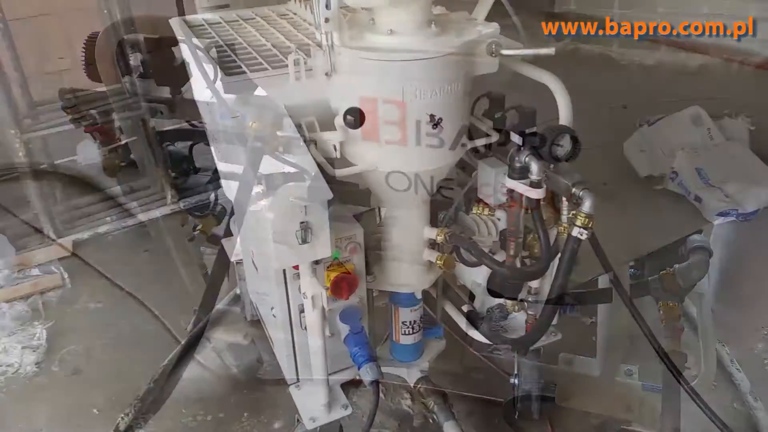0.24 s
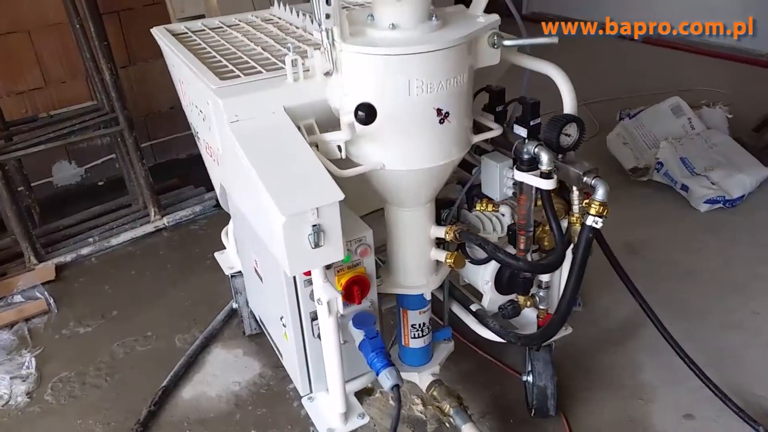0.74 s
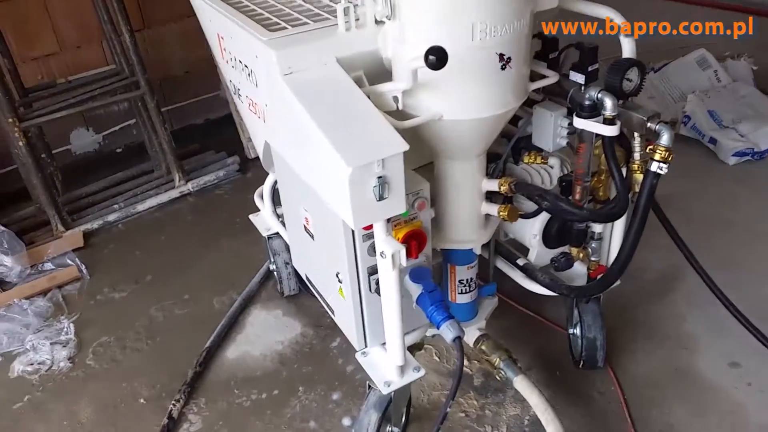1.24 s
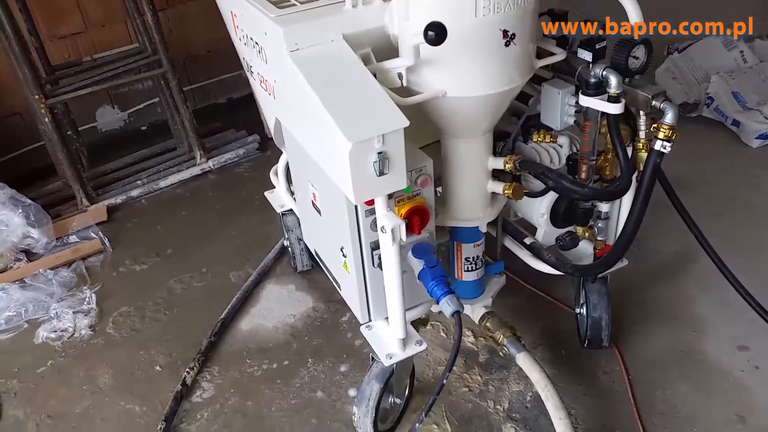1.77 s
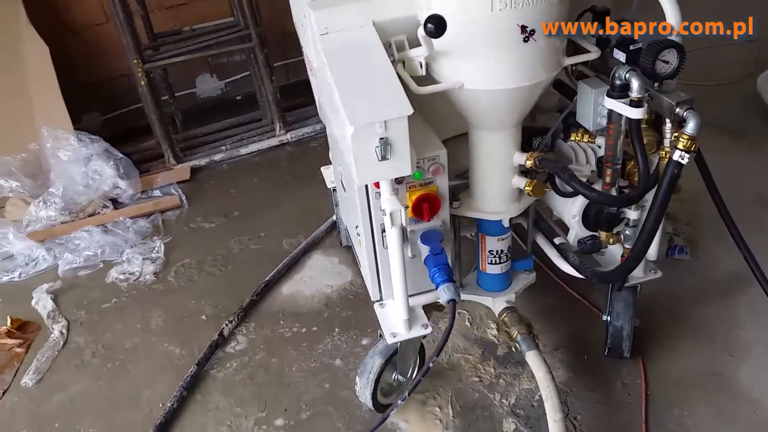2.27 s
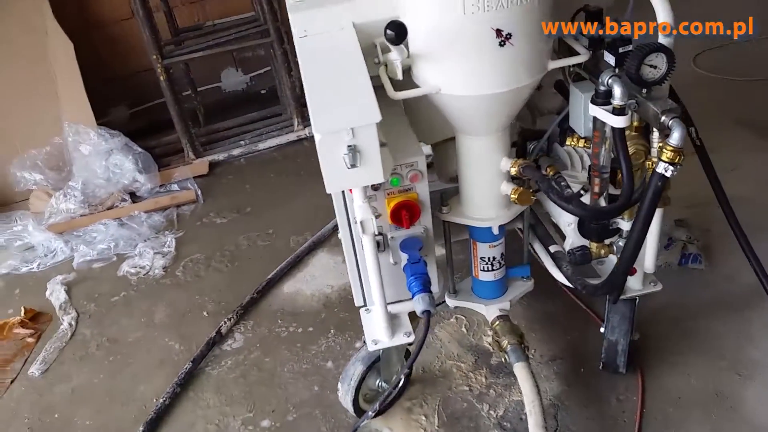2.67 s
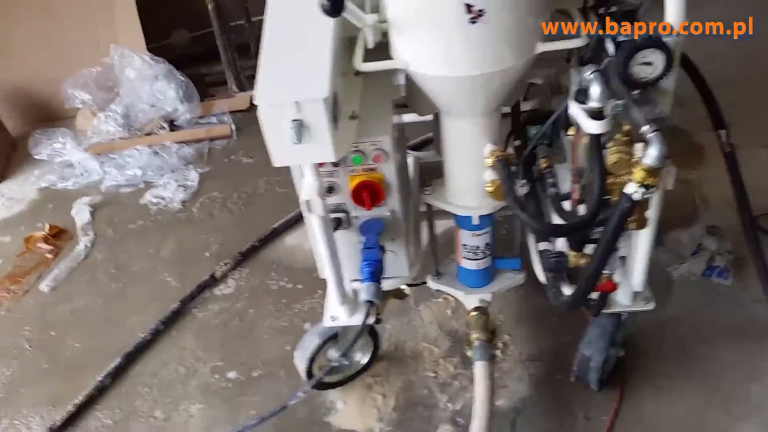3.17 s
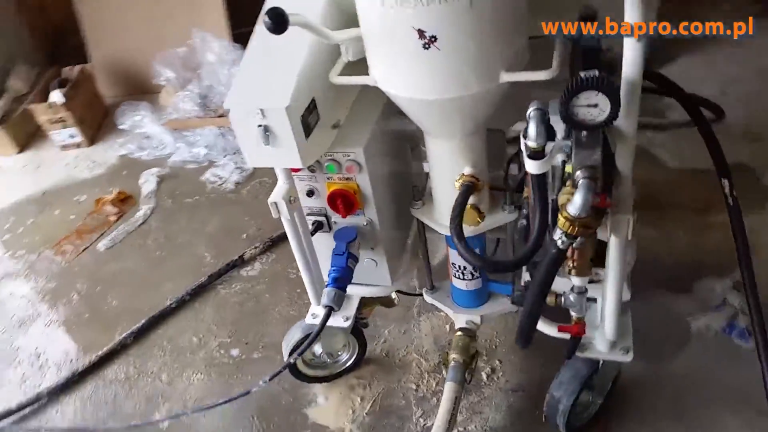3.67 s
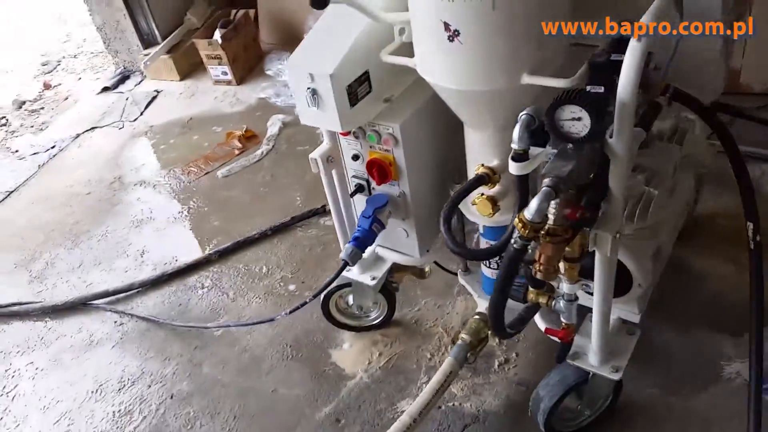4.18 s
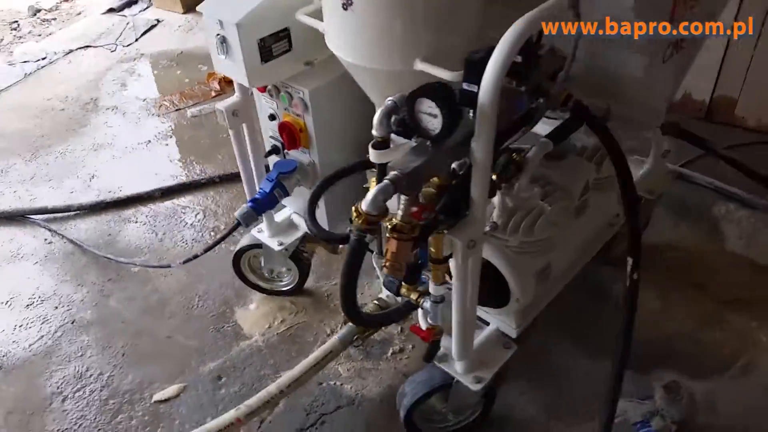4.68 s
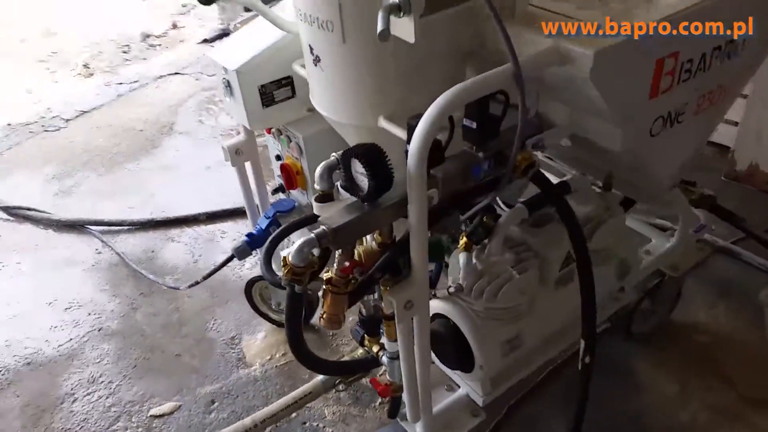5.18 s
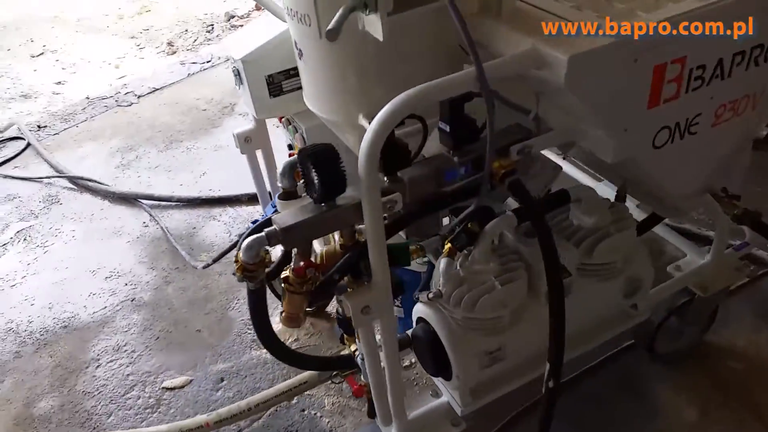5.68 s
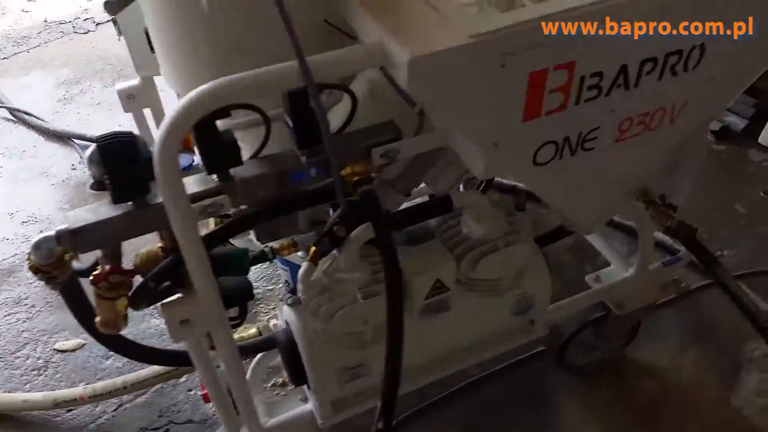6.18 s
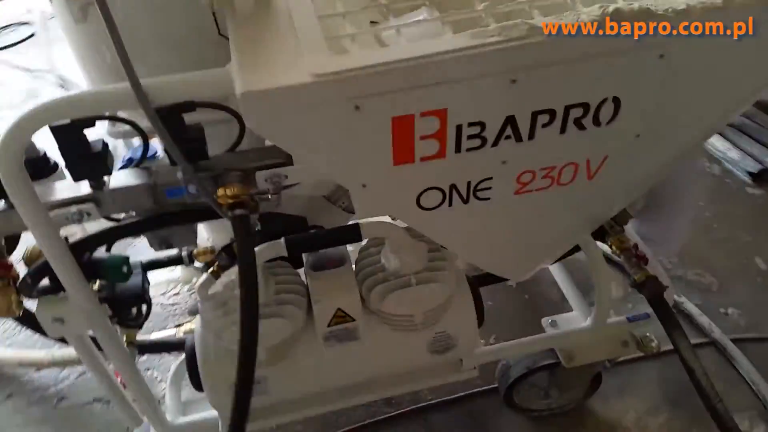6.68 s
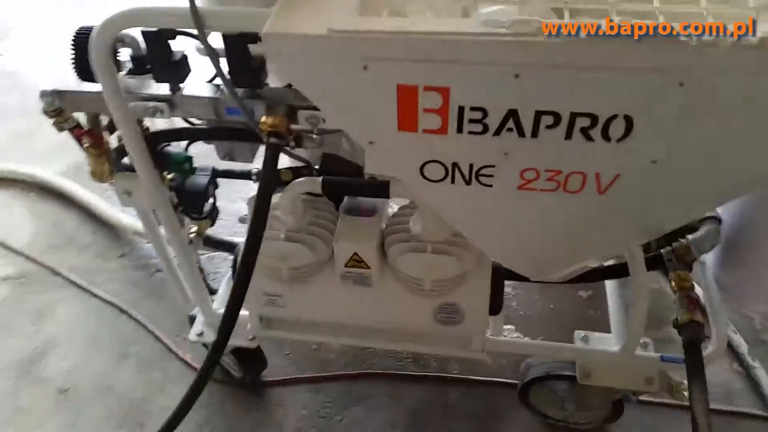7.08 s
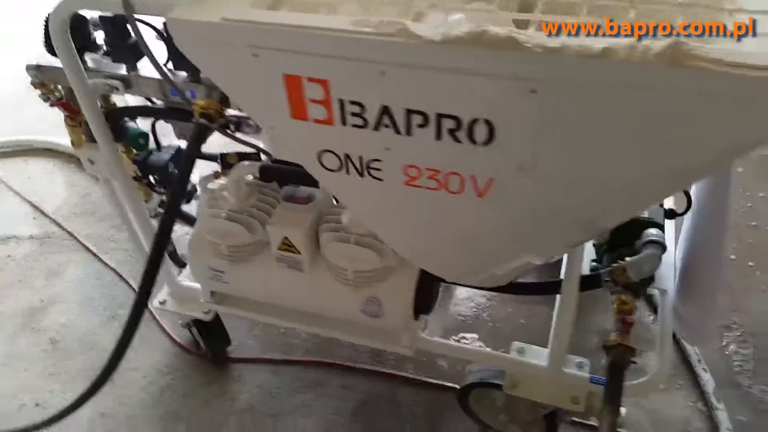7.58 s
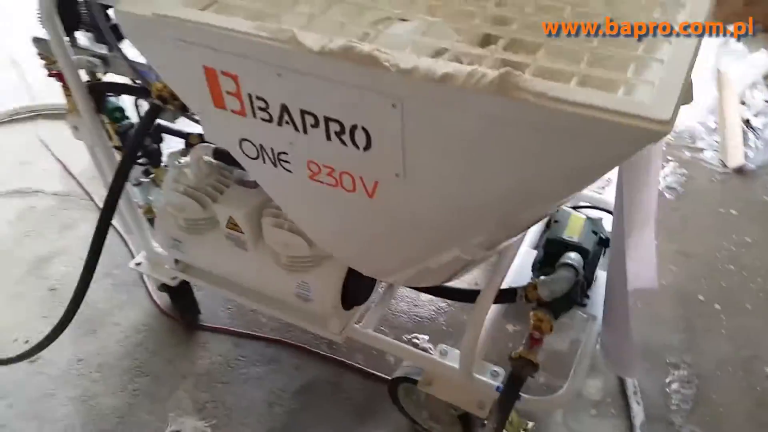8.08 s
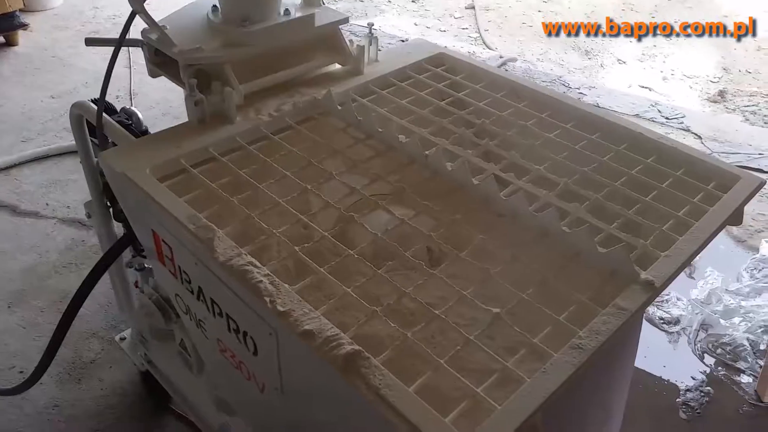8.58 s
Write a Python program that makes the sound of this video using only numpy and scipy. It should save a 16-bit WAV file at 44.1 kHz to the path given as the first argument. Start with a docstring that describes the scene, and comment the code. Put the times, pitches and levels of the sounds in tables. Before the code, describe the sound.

At about 0.2 seconds a plastering machine starts and swells up in a bare concrete room. Its air compressor gives a fast, low throb with high hissing valves, whining gears and a rattling casing, over the gritty churn of the mixer. The microphone moves around it at close range, so the hum and whines keep shifting in tone. Two short knocks come near 3 seconds, the second louder, and the machine sinks briefly around 3.5 seconds. A few faint hollow blips pass between 3.5 and 5.8 seconds, with a brief gritty scuff at 5.2. At 6.9 seconds the compressor cuts out with a clack and the relief valve blows off a sharp burst of air, which dwindles to a trickle and is gone by about 7.8. After a short quiet, the machine starts again near 8.4 seconds, heard from above the hopper.

```python
"""A plastering machine swells up in a bare concrete room and the listener walks round it.
Its air compressor throbs once a shaft turn, with hissing valves, whining gears and a rattling casing,
over the churning mixer. Two knocks, a few hollow blips and a scuff pass on the way.
Near 7 s the compressor cuts out with a clack and the relief valve blows off its air, down to a trickle.
After a short quiet the machine starts again, heard from over the hopper."""
import sys
import numpy as np
from scipy import signal
from scipy.fft import rfft, irfft
from scipy.io import wavfile
from scipy.ndimage import uniform_filter1d

SR = 44100
rng = np.random.default_rng(int(sys.argv[2]) if len(sys.argv) > 2 else 0)


def log_audio(samples):
    """Write samples as a 16-bit WAV file to the path given in sys.argv[1]."""
    # one column per channel
    frames = np.atleast_2d(samples).T
    # limit to full scale, then quantise
    limited = np.clip(frames, -1, 1)
    pcm = np.round(limited * 32767).astype(np.int16)
    wavfile.write(sys.argv[1], SR, pcm)


N = 389844
TIME, BIN_HZ = np.arange(N) / SR, np.maximum(np.arange(N // 2 + 1) * SR / N, 1)
BLOW_OFF_S, FREE_TURNS_PER_S = 6.896, 23.812

# The machine's runs. Each row: start, stop and first stroke, all in seconds.
RUNS = [(.215, 6.9, .256), (8.362, 8.9, 8.383)]
# Valve puffs. Each row: point in the turn from 0 to 1, relative dB, decay in turns, gap pitch in Hz.
VALVES = [(.055, -4.5, .06, 15300), (.125, 1.5, .12, 13100), (.395, -1, .08, 12140), (.635, -1, .1, 14200),
          (.9, -7.5, 0.055, 15250)]
# Stereo width. Each row: frequency in Hz, likeness of the two microphones (held to 0-1 in use).
LIKENESS = [(30, 1.1), (70, 1), (130, 0.5), (290, 0.9), (640, 0.74), (1000, .5), (1500, 0.17), (3000, -0.1),
            (15000, 0)]
# Stereo lean. Each row: frequency in Hz, left over right in dB.
MIC_BALANCE = [(60, 1), (200, 3.5), (400, 5.5), (700, 5.5), (2400, 7.5), (3400, 1), (6000, 0.5),
               (8000, 12.5), (9200, 10), (11200, -1), (13000, -11), (15500, -8)]


def machine():
    """Compressor and mixer, crossfaded from place to place along the walk."""
    # Each row: time in seconds, place (0 mixer front, 1 hose outlet, 2 corner, 3 beside the compressor,
    # 4 and up over the hopper).
    walk = [(2.72, 0), (3.06, 1), (3.25, 1.5), (3.42, 2), (4.4, 2), (5.45, 3), (6.9, 3), (8.1, 6.5)]
    # One row a place: share of clatter that repeats, share of hiss that pulses, valve delay in turns.
    places = [(.2, .22, .15), (.35, .35, .17), (.85, .6, .07), (.86, .85, 0), (.2, .25, .045)]
    # Mortar churning in the mixer. Each row: frequency in Hz, relative density in dB.
    mortar = [(25, -26), (55, -11), (110, -7.5), (190, 1.5), (260, -6.5), (340, -19.5)]
    turns = shaft_turns()
    place = np.clip(in_time(walk)[0], 0, len(places) - 1)
    nearness = np.array([np.maximum(0, 1 - abs(place - k)) for k in range(len(places))])
    throb_db, clatter_db, hiss_db = loudness(nearness)
    repeats, pulsing, delay = np.array(places).T @ nearness
    puffs = valve_puffs(turns - delay, pulsing)
    hum = from_db(throb_db) * throb(turns, nearness)
    drive = .38 + .22 * np.linalg.norm(puffs, axis=0)
    body = clatter(turns, nearness, repeats, drive) + whines(turns)
    body += from_db(-4.5) * np.sqrt(1 - repeats) * coloured(white(), mortar)   # strongest by the mixer
    noise = from_db(clatter_db) * body + from_db(hiss_db) * valve_hiss(puffs)
    noise = short_paths(noise, strength=.75 * repeats)
    return running(stop_s=.03) * hum + running(stop_s=.015) * noise + head_rattle(turns)


def shaft_turns():
    """Turns of the compressor shaft, counted from the first stroke of each run."""
    # The shaft slows as pressure builds and runs free after the blow-off.
    # Each row: time in seconds, turns per second.
    speed = [(.2, 23.82), (1.3, 23.78), (2.65, 23.775), (3.1, 23.49), (3.55, 23.7), (4.4, 23.555),
             (5.3, 23.415), (6.9, 23.425), (8.3, 23.812)]
    turns = np.cumsum(in_time(speed)[0]) / SR
    for on, _, first_stroke in RUNS:
        turns = turns - (TIME > on) * np.interp(first_stroke, TIME, turns)
    return turns


def running(stop_s, dip_s=3.012, dip_db=-11, recovery_s=.016):
    """Each run sets in softly, swells and holds until it stops; the level dips after the loudest knock."""
    # One row a run: starting level in dB, rise time in seconds.
    rises = [(-13, 0.65), (-35, .27)]
    gain = 0
    for (on, off, _), (start_db, rise_s) in zip(RUNS, rises):
        swell = np.interp(TIME, [on, on + rise_s], [from_db(start_db), 1]) * (TIME > on)
        gain += swell * np.clip((off - TIME) / stop_s, 0, 1)
    dip = from_db(dip_db * (TIME > dip_s) * np.exp(-abs(TIME - dip_s) / recovery_s))
    return uniform_filter1d(gain * dip, size=90)


def loudness(nearness):
    """The mix in dB: set by the place, swelling or sinking at each loud or quiet spot passed."""
    # One row a place: throb, clatter and valve hiss in dB.
    levels = [(-16.5, -23, -25), (-13.5, -28, -31.5), (-12, -33.5, -35.5), (-11.5, -31, -29),
              (-15, -22.5, -29)]
    # Each row: time and half-width in seconds, then change of throb, clatter and hiss in dB.
    spots = [(2.55, 0.18, 1, 0.7, 0), (2.94, 0.17, 2.5, -0.5, 0.5), (3.53, 0.39, -6.5, -4.5, -6.5),
             (4.42, 0.32, 0.5, 1.6, 4.5), (6.8, 0.38, -2.5, -0.5, 2)]
    spots_db = sum(np.outer(change_db, bump(s, width_s)) for s, width_s, *change_db in spots)
    return np.array(levels).T @ nearness + spots_db


def throb(turns, nearness, waver_db=.88, right_lag_s=.0001):
    """One pressure pulse a turn; standing waves in the room favour other harmonics at each place."""
    # One list a place. Each pair: shaft multiple, relative level in dB.
    harmonics = [
        [(1, -47), (2, -27), (3, -38), (4, -13), (5, -7.5), (6, -6), (7, 2), (8, -1.5), (9, 0), (10, -13.5),
         (11, -4), (12, -28), (13, -34)],
        [(1, -46), (2, -33), (3, -38), (4, -26), (5, -22), (6, -7.5), (7, -7), (8, -6.5), (9, -0.5), (10, -28),
         (11, -10), (12, -25), (13, -27)],
        [(1, -46), (2, -31.5), (3, -41), (4, -30.5), (5, -28.5), (6, -4.5), (7, -6), (8, -6), (9, 1),
         (10, -29.5), (11, -12), (12, -29), (13, -29)],
        [(1, -46.5), (2, -27), (3, -37), (4, -20), (5, -40), (6, 0.5), (7, -9.5), (8, -4), (9, -6.5),
         (10, -25.5), (11, -26.5), (12, -26), (13, -32)],
        [(1, -32), (2, -31.5), (3, -35), (4, -9.5), (5, -12), (6, 2), (7, -14), (8, -2.5), (9, -1.5), (10, -13),
         (11, -5.5), (12, -31), (13, -35)],
    ]
    # Each row: time and half-width in seconds, shaft multiple, its boost or cut in dB.
    standing_waves = [(.35, .35, 9, 3.5), (.35, 0.21, 8, 2.5), (2.15, 0.34, 6, 2), (2.7, .35, 11, 3),
                      (2.7, 0.24, 6, -4), (3.55, 0.36, 6, -6), (3.55, 0.29, 7, -2.5), (3.7, 0.29, 10, 5),
                      (4.5, 0.22, 6, 2.5), (5.6, .45, 9, -2), (6.5, 0.29, 9, 3.5), (6.75, 0.34, 10, 11),
                      (6.75, .25, 5, 10)]
    # Reflections spread the pulse. Each row: time in seconds, smear in radians, delay in turns.
    reflections = [(.9, -.22, .23), (1.5, -.22, .245), (2.7, -.22, .21), (3.1, -.2, .1), (3.45, -.1, .085),
                   (4.4, -.13, .06), (5.3, -.17, .045), (6.1, -.25, 0), (6.75, -.36, 0), (8.3, 0, 0)]
    smear, delay = in_time(reflections)
    heights = from_db(np.array(harmonics)[:, :, 1])
    heights /= np.sqrt(np.sum(heights ** 2, axis=1, keepdims=True) / 2)
    angle, out, power = 2 * np.pi * (turns % 1), 0, 0
    for k, by_place in enumerate(heights.T, 1):
        standing_db = sum(db * bump(s, width_s)
                          for s, width_s, multiple, db in standing_waves if multiple == k)
        height = by_place @ nearness * from_db(standing_db + waver_db * drift(2.3))
        from_seventh = np.clip(k - 7, -4, 4)
        phase_lag = smear * from_seventh ** 2 + 2 * np.pi * delay * from_seventh
        out += height * np.cos(k * angle - phase_lag)
        power += height ** 2 / 2
    out /= np.sqrt(power)
    return np.array([out, np.interp(TIME - right_lag_s, TIME, out)]) * panned(2.74)


def valve_puffs(turns, pulsing, rise_turns=.03, uneven_db=2.5):
    """One envelope a valve: it snaps open and its puff dies away over a steady leak."""
    puffs = []
    for start, level_db, decay, _ in VALVES:
        age = (turns - start) % 1
        strength = from_db(level_db + uneven_db * drift(13.5))
        puffs.append(strength * (1 - np.exp(-age / rise_turns)) * np.exp(-age / decay))
    power = np.array(puffs) ** 2
    return np.sqrt((1 - pulsing) / len(VALVES) + pulsing * power / power.sum(axis=0).mean())


def valve_hiss(puffs):
    """Air rushes through each valve gap, which sings at a pitch of its own."""
    # Each row: frequency in Hz, relative density in dB.
    hiss = [(6180, -39.5), (10500, -18), (11200, -11), (12200, -2), (13000, 1.5), (13650, -2.5),
            (14500, -2), (15300, 0.5), (15900, -1)]
    air = sum(puff * emphasised(white(), hz, width_hz=700, boost_db=4.5)
              for puff, (*_, hz) in zip(puffs, VALVES))
    return coloured(air, hiss)


def clatter(turns, nearness, repeats, drive, grit_db=1.5, play_turns=.0013, size=1800):
    """The same small impacts return every turn, amid the ever-new grinding of sand in the mixer."""
    # One list a place. Each pair: frequency in Hz, relative density in dB.
    spectra = [
        [(290, -10), (380, -13.5), (480, -8), (560, -12.5), (700, -5), (870, -7.5), (1000, -7), (1700, -8.5),
         (2300, -12.5), (3000, -20), (4000, -17), (6000, -22), (11000, -23.5)],
        [(290, -6), (380, -11.5), (560, -8), (780, -1.5), (1000, -8), (1300, -3), (1700, -11), (2400, -17.5),
         (3300, -24), (4500, -19), (5700, -31), (8400, -25.5), (11000, -30)],
        [(290, 3.5), (340, -5), (550, -13.5), (700, -6), (1050, -10), (1180, -15.5), (1700, -15), (2300, -21.5),
         (2520, -21), (3200, -35.5), (4000, -25), (4480, -18.5), (5600, -37.5), (6300, -34.5), (7100, -38),
         (8100, -30), (8450, -24.5), (9100, -35), (11000, -35)],
        [(290, -4), (360, -2), (460, -8), (600, -10), (680, -3), (850, -2), (1000, -5.5), (1170, -10),
         (1850, -18), (2280, -21.5), (2480, -20), (3150, -28), (3900, -18.5), (4600, -19), (5850, -33),
         (6450, -28), (7100, -32), (8400, -22), (11000, -28.5)],
        [(290, -3.5), (400, -14.5), (520, -10), (720, 0), (850, -9), (1600, -8.5), (2400, -14.5), (3000, -18),
         (4200, -19.5), (6000, -23), (11000, -23.5)],
    ]
    position = (turns + play_turns * drift(25)) % 1 * size   # bearing play blurs the highest partials
    patterns = irfft(np.exp(2j * np.pi * rng.random((2, size // 2 + 1))))
    rattle = np.array([np.interp(position, np.arange(size), p, period=size) for p in patterns])
    shift = .94 * drift(.63)   # the mix of echo paths changes slowly along the walk
    rattle = np.cos(shift) * rattle + np.sin(shift) * rattle[::-1] * [[1], [-1]]
    grinding = white() * from_db(grit_db * drift(120))
    force = np.sqrt(repeats) * rattle / rattle.std() + np.sqrt(1 - repeats) * grinding / grinding.std()
    return sum(near * coloured(drive * force, spectrum) for near, spectrum in zip(nearness, spectra))


def whines(turns, waver_db=1.26, wander_radians=.15, fade_s=.22):
    """Narrow tones of gears and casing swell and fade; each meets the microphones with its own phase."""
    # Each row: shaft multiple, start and end in seconds, level in dB against the clatter.
    tones = [(20.85, -0.5, 3.2, -8), (29.95, 0, 2.9, -10), (40.9, 0, 2.9, -13.5), (57.1, 0, 3.0, -12.5),
             (70.9, 0, 2.9, -16.5), (65.6, 2.3, 3.35, -10), (70.1, 2.98, 3.4, -7), (46.1, 6.0, 7, -7.5),
             (65.95, 8, 9, -4), (17.86, 0, 3, -21), (24.87, 0, 4.4, -19), (26.9, 0, 4.2, -16.5),
             (28.03, 0, 3, -17.5), (33, 0, 3, -18.5), (35.04, 0, 3, -16), (42.04, 0, 3, -18.5),
             (45.9, 0, 3, -19.5), (48.1, .8, 1.4, -12.5), (350.6, .5, 3, -31), (29.9, 3.3, 4.1, -11),
             (35.85, 3.3, 4.1, -12), (55, 3.1, 4.8, -15), (71, 3.3, 6.2, -19), (38, 4, 5, -11),
             (32, 4.2, 5.2, -9), (33, 3.75, 4.27, -3), (29, 3.9, 4.6, -5.5), (29, 5.15, 6.25, -4.5),
             (70.4, 4.05, 4.47, -6.5), (30, 4.45, 5.02, -1.5), (37, 5.3, 5.7, -7), (40, 6.1, 7, -9),
             (35, 6.35, 7, -9), (28, 6.3, 7, -9.5), (42, 4.72, 5.25, -6.5), (42, 5.25, 7, -1),
             (44, 4.65, 5.1, -4.5), (44, 5.1, 6.05, -11), (44, 6.05, 7, -3), (15, 4.6, 6.5, -10),
             (56, 6.45, 7, -13)]
    out = np.zeros((2, N))
    slow_phase = np.tile(wander_radians * drift(2), 2)
    slow_gain = np.tile(from_db(waver_db * drift(4.5)), 2)
    for multiple, start, end, level_db in tones:
        hz = multiple * FREE_TURNS_PER_S
        first, last = np.searchsorted(TIME, [start - fade_s / 2, end + fade_s / 2])
        shift = rng.integers(N)   # every tone wavers on its own
        at, own = slice(first, last), slice(first + shift, last + shift)
        fade = np.minimum(.5 + np.minimum(TIME[at] - start, end - TIME[at]) / fade_s, 1)
        spread = np.arccos(np.clip(at_hz(LIKENESS, hz), 0, 1)) * rng.choice([-1, 1])
        phase = 2 * np.pi * (multiple * turns[at] + rng.random()) + slow_phase[own]
        sides = np.sqrt(2) * from_db(level_db) * panned(at_hz(MIC_BALANCE, hz))
        out[:, at] += fade * slow_gain[own] * np.cos(phase + [[spread / 2], [-spread / 2]]) * sides
    return out


def head_rattle(turns, slap_decay_s=.006, clack_decay_s=.0022):
    """Valve plates slap twice a turn and the unloader clacks at the stop; both ring the cylinder head."""
    # The unloader's clack and bounces. Each row: start in seconds, force in dB.
    clacks = [(6.896, -16), (6.904, -24), (6.911, -25)]
    # The head's modes. Each row: pitch in Hz, relative level in dB, seconds to fall 60 dB.
    modes = [(2490, -1, 0.015), (3500, -6, 0.011), (3750, -3, .012), (4550, -2, 0.0076), (6600, -6.5, .005)]
    slaps = sum(from_db(db) * np.exp(-((turns - start) % 1) / FREE_TURNS_PER_S / slap_decay_s)
                for start, db in [(.13, -5), (.635, 0)])
    near = bump(6.64, width_s=.55) * (TIME < BLOW_OFF_S)   # heard only right beside the compressor
    force = from_db(-38) * near * slaps / np.sqrt(np.mean(slaps ** 2))
    for s, db in clacks:
        force += from_db(db) * (TIME > s) * np.exp(-np.clip(TIME - s, 0, .2) / clack_decay_s)
    chatter = white() * force
    power = sum(from_db(db) ** 2 * t60 * SR / (4 * np.log(1000)) for _, db, t60 in modes)
    rings = sum((-1) ** k * from_db(db) * ring(chatter, hz, t60) for k, (hz, db, t60) in enumerate(modes))
    return rings / np.sqrt(power) * panned(1.5)


def blow_off(burst_db=5.5, burst_s=.015, flutter_db=1, pipe_hz=429, pipe_ring=.45, pipe_s=.15):
    """The relief valve pops and its pipe rings; the roar fades first, the jet dulls as pressure drops."""
    # The thin jet and the low roar. Each row: frequency in Hz, relative density in dB.
    jet_colour = [(1650, -45), (2800, -26), (3240, -12), (3530, -7.5), (4180, -9), (5190, -10.5),
                  (5580, -17.5), (6140, -13), (7690, -10), (8270, -8.5), (10700, -10), (11800, -8),
                  (13900, -2), (14700, -3.5), (15900, -7)]
    roar_colour = [(35, -24), (60, -6), (113, 3.5), (251, -3.5), (449, -8), (800, -6), (1280, -5),
                   (3200, -4.5), (4160, -34), (7040, -120)]
    # The valve's resonances. Each row: centre and width in Hz, boost in dB.
    resonances = [(3645, 164, 5), (4730, 250, 3.5), (9100, 330, 3), (14500, 320, 4)]
    # Each row: frequency in Hz, left over right in dB.
    balance = [(60, -3), (110, 0.5), (200, -4), (380, -10.5), (700, -10.5), (1290, -1), (2380, 4.5),
               (4400, 0.5), (8120, 7), (15000, -6.5)]
    age = np.maximum(TIME - BLOW_OFF_S, 0)
    pop = (1 - np.exp(-age / .0006)) * from_db(burst_db * np.exp(-age / burst_s))
    air, echo = white(), pipe_ring * np.exp(-age / pipe_s)
    air = sum(echo ** k * np.roll(air, k * round(SR / pipe_hz), axis=1) for k in range(3))
    air /= np.sqrt(1 + echo ** 2 + echo ** 4)
    for hz, width_hz, boost_db in resonances:
        air = emphasised(air, hz, width_hz, boost_db)
    air = from_db(flutter_db * drift(60)) * coloured(short_paths(air, strength=.5), jet_colour, balance)
    top = above(air, hz=10500)
    low_air = coloured(white(), roar_colour, balance)
    jet = (air - top) * outflow(age, opening_db=-17.5, fall_db_per_s=66.5, trickle_db=-31, power=3)
    sizzle = top * outflow(age, opening_db=-16.5, fall_db_per_s=46.5, trickle_db=-30, power=5.5)
    roar = low_air * outflow(age, opening_db=-30, fall_db_per_s=83, trickle_db=-55.5, power=1.5)
    return pop * (jet + sizzle + roar)


def outflow(age, opening_db, fall_db_per_s, trickle_db, power, hold_s=.087, fade_from_s=.5, empty_s=.97):
    """Escaping air holds for a moment and falls to a trickle, which ends as the last pressure runs out."""
    rush = from_db(opening_db - fall_db_per_s * np.maximum(age - hold_s, 0))
    pressure = np.interp(age, [fade_from_s, empty_s], [1, 0])
    return np.hypot(rush, from_db(trickle_db)) * pressure ** power


def knocks():
    """Short knocks: a click on a low thud."""
    # Each row: start in seconds, force in dB.
    hits = [(2.9364, -14), (3.0093, -3.5), (6.93, -19)]
    # Each row: pitch in Hz, gain in dB, seconds to fall 60 dB, left over right in dB.
    modes = [(65, -15, 0.032, -3), (150, -4.5, .022, -10), (385, 1, .011, 9), (562, -7.5, 0.0073, 0.5),
             (950, -7, .004, 3), (1400, -7.5, .004, -2.5), (2500, -16, 0.00297, 2), (6020, -24, .002, 2)]
    clicks = np.zeros(N)
    for s, force_db in hits:
        clicks[round(s * SR)] = from_db(force_db)
    return sum(from_db(db) * ring(clicks, hz, t60) * panned(lean_db) for hz, db, t60, lean_db in modes)


def scuff(peak_s=5.203, width_s=.0286):
    """A brief gritty scrape, like a shoe sliding on the floor."""
    # Each row: frequency in Hz, relative density in dB.
    grit = [(500, -17), (1200, 3), (2200, -2.5), (3000, -18), (6500, -19.5), (11000, -23)]
    stroke = np.exp(-abs(TIME - peak_s) / width_s)
    return from_db(-25) * stroke * coloured(white() * from_db(1.2 * drift(150)), grit)


def blips(width_s=.036):
    """Faint hollow tones that swell and vanish in a moment."""
    # Each row: centre in seconds, pitch in Hz, peak in dB before panning.
    tones = [(3.501, 452, -39), (3.66, 449, -39.5), (4.9, 505, -33), (5.417, 493, -32.5), (5.75, 490, -35),
             (7.6, 420, -58)]
    out = sum(from_db(db) * bump(s, width_s) * np.sin(2 * np.pi * hz * TIME) for s, hz, db in tones)
    return out * panned(4.3)


def room_tone():
    """The low, gently wavering quiet of the site, which comes in with the first run."""
    # Each row: frequency in Hz, relative density in dB.
    colour = [(28, -12), (70, -4), (110, -4.5), (160, -14), (260, -10), (420, -19), (750, -22),
              (1200, -17.5), (1900, -23), (2800, -42.5), (15000, -54.5)]
    level = from_db(-59 + 1.2 * drift(5)) * (TIME > RUNS[0][0])
    return level * coloured(white(), colour, balance=[(60, 1), (1000, 6.5)])


def short_paths(pair, strength, count=10, lag_range_s=(.0004, .004)):
    """Frame and hopper reflect the treble; its peaks and notches shift as the listener moves."""
    treble = above(pair, hz=2000)
    out = pair - treble
    for side in range(2):
        lags = (rng.uniform(*lag_range_s, count) * SR).astype(int)
        gains = np.array([drift(.6) for _ in lags])
        echoes = sum(gain * np.roll(treble[side], lag) for gain, lag in zip(gains, lags))
        echoes /= np.linalg.norm(gains, axis=0)
        out[side] += (treble[side] + strength * echoes) / np.sqrt(1 + strength ** 2)
    return out


def coloured(pair, spectrum, balance=MIC_BALANCE):
    """Two unrelated signals become one stereo sound of this spectrum, with steep ends; mono rms 1."""
    hz = np.geomspace(10, SR / 2, num=600)
    alike = np.clip(at_hz(LIKENESS, hz), 0, 1)
    ends = np.minimum(1, np.minimum(hz / spectrum[0][0], spectrum[-1][0] / hz)) ** 6
    left, right = panned(at_hz(balance, hz))
    gain = from_db(at_hz(spectrum, hz)) * ends / np.sqrt(left ** 2 + right ** 2 + 2 * alike * left * right)
    mid, side = rfft(pair)
    mid *= np.interp(BIN_HZ, hz, np.sqrt(1 + alike))
    side *= np.interp(BIN_HZ, hz, np.sqrt(1 - alike))
    out = irfft([(mid + side) * np.interp(BIN_HZ, hz, gain * left),
                 (mid - side) * np.interp(BIN_HZ, hz, gain * right)], N)
    return out / out.mean(axis=0).std()


def ring(clicks, hz, t60):
    """A unit click sets a sine of height 1 ringing."""
    r, w = from_db(-60 / (t60 * SR)), 2 * np.pi * hz / SR
    return signal.lfilter([0, np.sin(w)], [1, -2 * r * np.cos(w), r * r], clicks + 1e-18)


def emphasised(x, hz, width_hz, boost_db):
    """A resonance lifts one narrow band."""
    b, a = signal.iirpeak(hz, hz / width_hz, fs=SR)
    return x + (from_db(boost_db) - 1) * signal.lfilter(b, a, x)


def above(x, hz):
    """High-pass without phase shift."""
    return signal.sosfiltfilt(signal.butter(2, hz, "high", fs=SR, output="sos"), x)


def drift(rate_hz):
    """Smooth random wander of spread 1, mostly slower than this rate."""
    r = np.exp(-200 * np.pi * rate_hz / SR)   # one step per 100 samples
    slow = signal.lfilter([1], [1, -2 * r, r * r], rng.standard_normal(N // 100 + 1002))[1000:]
    return np.interp(np.arange(N) / 100, np.arange(len(slow)), slow / slow.std())


def bump(centre_s, width_s):
    """A bell-shaped swell of height 1."""
    return np.exp(-((TIME - centre_s) / width_s) ** 2)


def white():
    """Two unrelated white noises."""
    return rng.standard_normal((2, N))


def panned(balance_db):
    """Left and right gains whose mean is 1."""
    gains = from_db(np.array([[.5], [-.5]]) * balance_db)
    return gains / gains.mean(axis=0)


def in_time(rows):
    """Each column of a curve at every sample."""
    s, *columns = np.transpose(rows)
    return [np.interp(TIME, s, column) for column in columns]


def at_hz(points, hz):
    """Read a spectrum on a log-frequency axis."""
    point_hz, values = np.transpose(points)
    return np.interp(np.log(hz), np.log(point_hz), values)


def from_db(db):
    """Decibels to gain."""
    return 10 ** (np.asarray(db) / 20)


def scene():
    """The machine, its blow-off and small noises over the quiet of the site."""
    return room_tone() + blow_off() + machine() + knocks() + blips() + scuff()


def record(dry, ceiling=.95, cutoff_hz=15750):
    """The highest peaks are rounded and the top is cut steeply."""
    rounded = dry / (1 + (dry / ceiling) ** 8) ** (1 / 8)
    return signal.sosfilt(signal.ellip(12, .1, 80, cutoff_hz, fs=SR, output="sos"), rounded)


dry = scene()
out = record(dry)
log_audio(out)
```